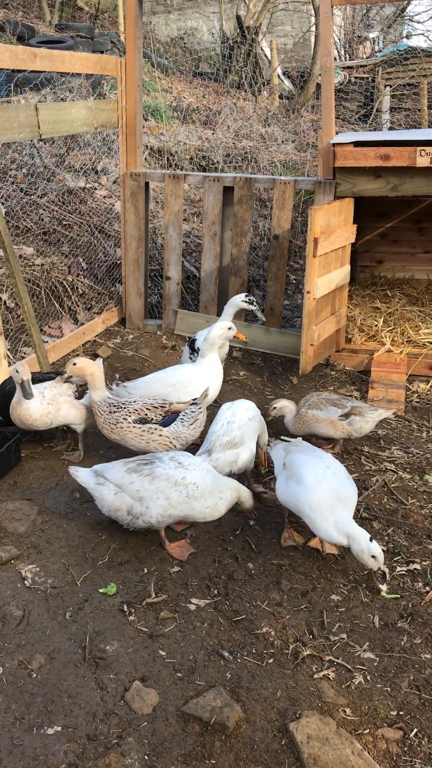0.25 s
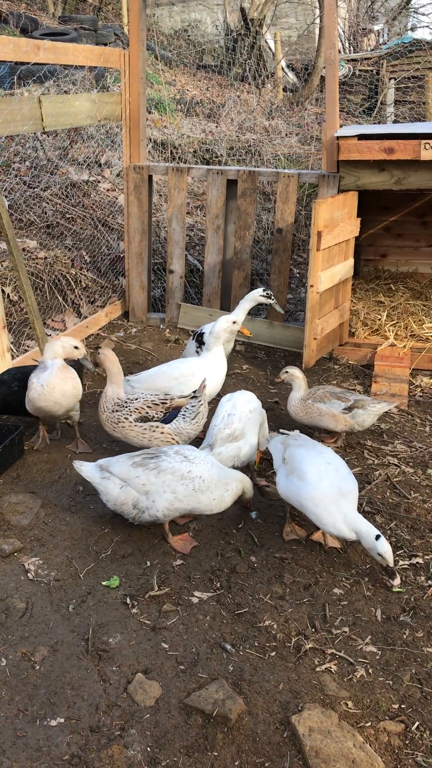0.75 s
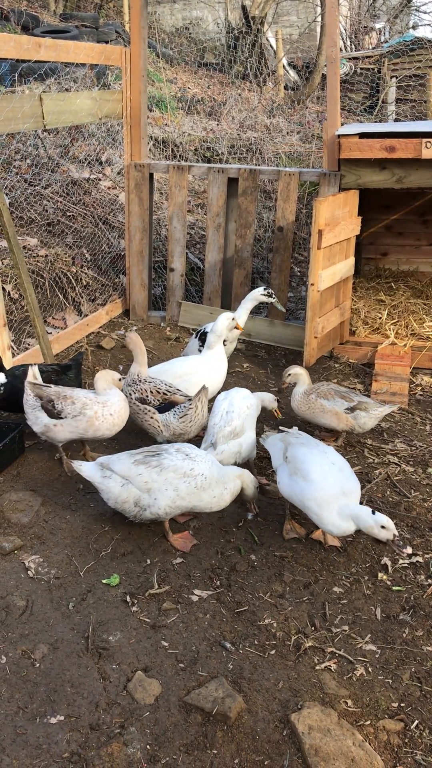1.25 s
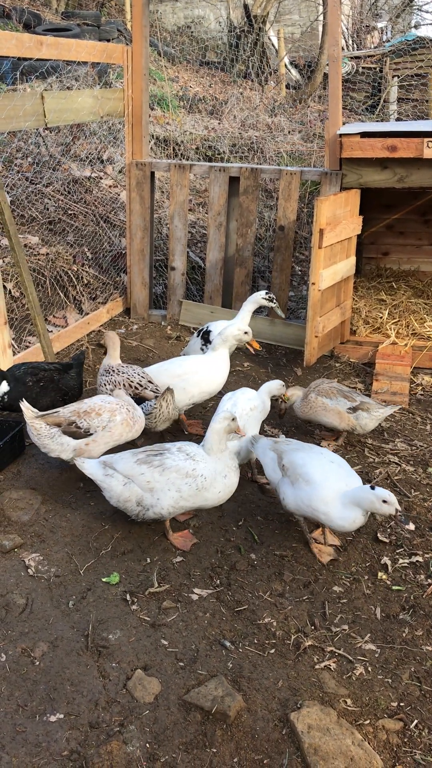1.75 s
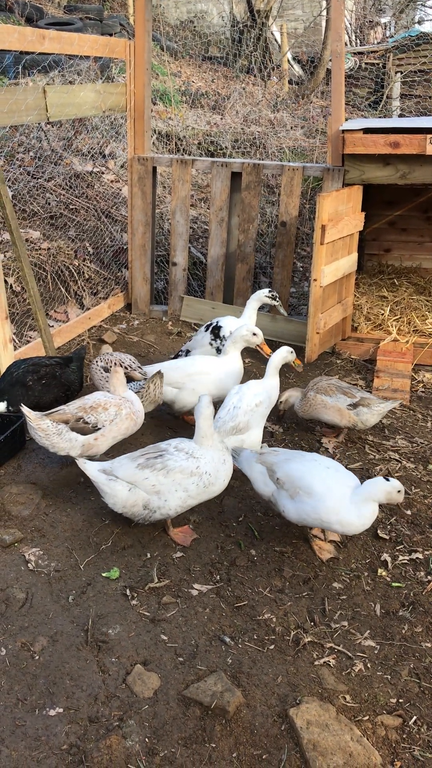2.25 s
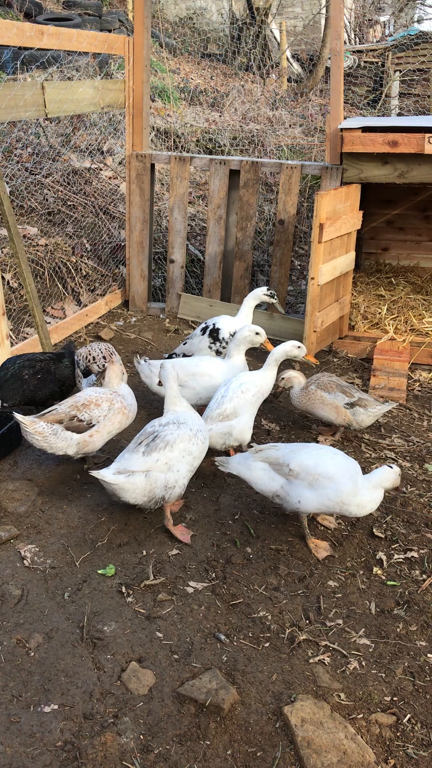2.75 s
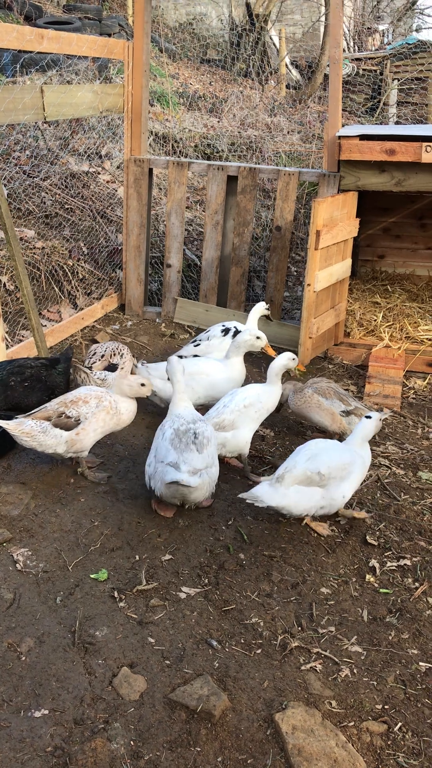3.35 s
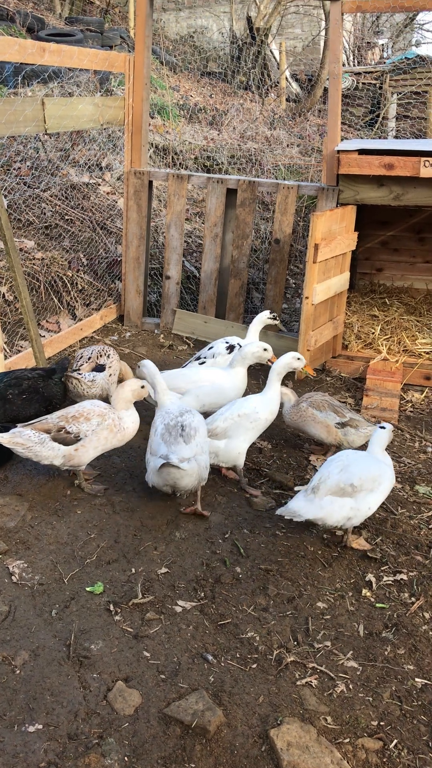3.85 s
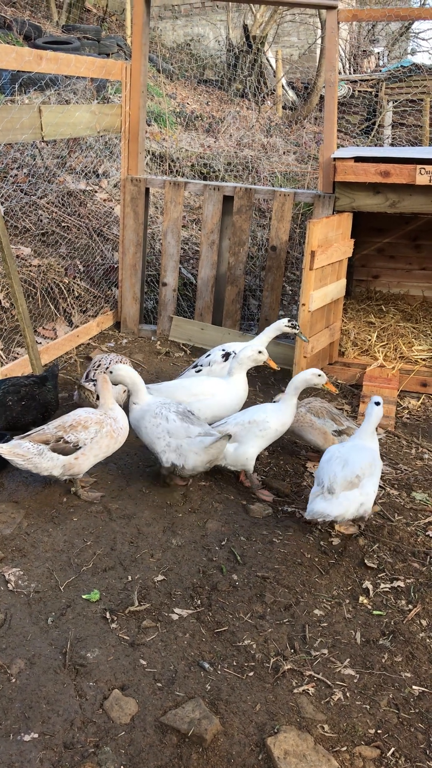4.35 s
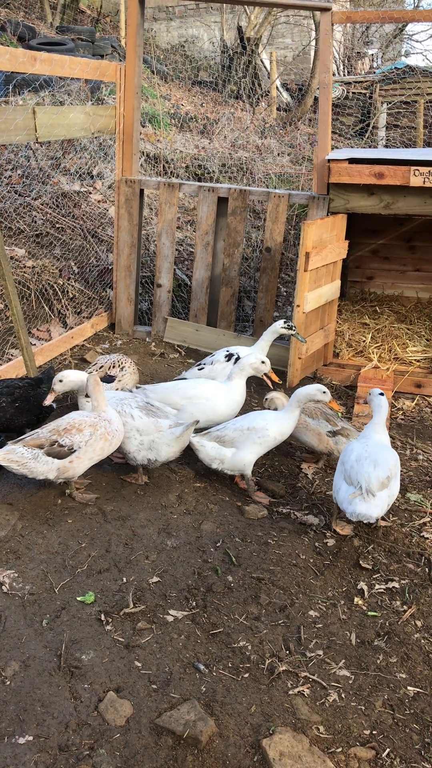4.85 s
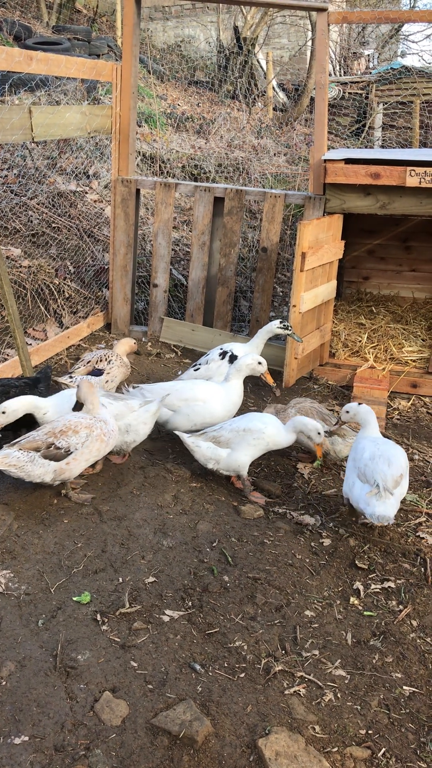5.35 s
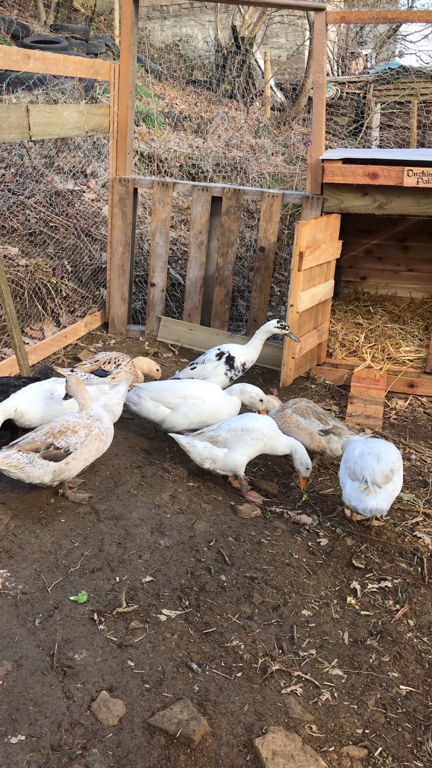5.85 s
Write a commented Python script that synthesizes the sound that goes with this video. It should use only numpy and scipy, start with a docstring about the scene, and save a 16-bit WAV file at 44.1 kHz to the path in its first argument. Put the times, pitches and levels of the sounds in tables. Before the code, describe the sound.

Several ducks quack busily in an outdoor pen, clipped calls tumbling over raspy murmurs and throaty croaks, with faint ticks and shuffling in dirt.

```python
"""Ducks chatter close by over the soft hiss of open air, a far rumble and a faint hum throughout.
Hens quack with quick air snaps ringing in bill and throat; drakes rasp with fluttering bands of noise.
Low croaks are slow snaps in a narrow throat, gulps are snaps in a wide one, and peeps are gliding tones.
Bills and feet click and shuffle as short noise bursts, and the fences give a few short, dull echoes."""
import sys
import numpy as np
from scipy import signal
from scipy.fft import rfft, irfft
from scipy.io import wavfile

SR = 44100
rng = np.random.default_rng(int(sys.argv[2]) if len(sys.argv) > 2 else 0)


def transcribe(signal):
    """Save signal, clipped to [-1, 1], as a 16-bit WAV file at the path in sys.argv[1]."""
    frames = np.atleast_2d(signal).T
    limited = np.clip(frames, -1, 1)
    pcm = np.round(limited * 32767).astype(np.int16)
    wavfile.write(sys.argv[1], SR, pcm)


N = 268877

# Colour of the open-air hiss: (frequency [Hz], relative level per Hz [dB])
AIR_COLOUR = [(30, -34), (60, -21), (110, -10.5), (250, -6.5), (600, -12.5), (1200, -12), (2200, -16),
              (3100, -22), (6000, -28.5), (9000, -36), (16000, -36.5)]
# Slow swells of the hiss: (time [s], change [dB])
AIR_SWELL = [(0, -1.5), (1.3, -5.5), (2.2, 0.5), (3.4, -2.5), (4.5, 1), (6.1, 1)]
# Far rumble: (time [s], level [dB])
RUMBLE_LEVEL = [(0, -59.5), (2, -63), (3.5, -66), (6.1, -67.5)]
# Hum, before its fixed lift and slow waver: (time [s], level [dB])
HUM_LEVEL = [(0.0, -76), (0.32, -66), (1.9, -57.5), (2.93, -64.5), (2.95, -70.5), (6.06, -59), (6.09, -65)]
# Loud ticks of bills and feet, before fixed trims and filtering:
# (time [s], bright part [dB], duller body compared with the bright part [dB])
CLICKS = [(0.0352, -43.5, -13), (0.0555, -41, -18), (0.1163, -30, -15), (0.948, -45.5, -9),
          (1.0082, -44, -27), (2.097, -42, -17), (2.6936, -40, -16), (2.7569, -43, -4),
          (2.7657, -24.5, -32), (3.1057, -40.5, -9), (3.1673, -43, -11), (3.229, -47.5, -5.5),
          (3.462, -46, -5.5), (3.5607, -36, -23), (3.598, -47, 1.5), (4.8274, -46, -29), (4.999, -53, -9),
          (5.019, -34, -30), (5.2014, -53, -9), (5.217, -38.5, -16), (5.2274, -64, -4),
          (5.2604, -34.5, -11.5), (5.296, -52, -5), (5.4122, -38.5, -11.5), (5.593, -33, -8.5),
          (5.9198, -43, -14), (5.953, -27.5, -54), (5.9804, -61.5, 10.5)]
# Quacks: (start of hold [s], attack before it [s], hold [s], bill level at start and end of hold [dB, dB],
# pitch at start and end of hold [Hz, Hz], middle of the bill resonances [Hz],
# throat, first partial, second partial and treble compared with the bill [dB, dB, dB, dB])
QUACKS = [ (.082, .02, 0.013, -37.5, -34.5, 301.5, 252.6, 1800, -1, -7, -7.5, -14),
          (.148, .008, 0.0076, -49, -48.5, 236.6, 208, 1660, -1.5, -11, -6, -15),
          (.19, .014, 0.032, -52.5, -51.5, 273, 229, 1620, 9, 0.5, -4, -10.5),
          (.252, .014, 0.0088, -39, -41, 369.6, 355, 1740, -5, -1, 1.5, -5.5),
          (.284, 0.021, .018, -34.5, -35, 329.5, 250.4, 2000, -4.5, -10, -8, -9),
          (.479, .004, 0.014, -50, -50, 228.2, 219, 1730, -3, 0.5, -2.5, -13),
          (.512, .015, .012, -43.5, -36, 340, 246.7, 1820, -11, -9.5, -12.5, -15.5),
          (.576, .014, .005, -44.5, -52, 190.8, 196, 2030, 2, -12, -25, -7),
          (0.636, 0.011, 0.0082, -26.5, -30, 320.7, 313, 1760, -24, -13.5, -16, -11),
          (.658, 0.015, .014, -34, -37, 254.3, 214.3, 1810, -10.5, -10.5, -16, -14),
          (.746, 0.0073, 0.0073, -30.5, -27, 344.5, 318.3, 1810, -14.5, -14.5, -17, -12.5),
          (.774, .012, 0.017, -35, -33, 353.2, 219.5, 1760, -9, -11, -13.5, -13.5),
          (.886, .006, 0.0063, -60, -60, 281, 250, 1700, 4, 6, 5, -14),
          (.906, 0.0096, .01, -33, -30.5, 274.5, 249.5, 1770, -6.5, -14, -14.5, -14.5),
          (0.949, 0.015, 0.013, -54, -61, 250, 214, 1750, 5, -6, 1, -14),
          (1.104, .006, 0.0056, -62, -63, 280, 249, 1700, 4, 6, 6, -14),
          (1.142, .016, 0.015, -53, -57.5, 203.4, 308, 1690, 10, -2, 5, -19),
          (1.168, .012, 0.009, -38.5, -33, 297, 259.5, 1720, -13, -10.5, -17, -16.5),
          (1.302, .013, 0.0094, -27.5, -30, 268.1, 264, 1750, -13.5, -13, -25, -17),
          (1.518, 0.0082, .006, -55, -56, 250, 230, 1800, 4, -1, 0, -12),
          (1.546, 0.019, 0.015, -42.5, -35.5, 342.2, 233.2, 1940, -5, -6.5, -6.5, -10.5),
          (1.66, 0.0048, 0.026, -38, -33.5, 272.6, 316, 2040, -6, -7.5, -10, -10),
          (1.727, 0.0082, .007, -56, -58, 260, 241, 1800, 8, 2, 4, -14),
          (1.759, 0.011, .03, -48, -62, 339, 282, 2140, 0.5, 0, -2.5, -14),
          (1.815, .008, .008, -55.5, -59, 267, 240, 1800, 8.5, 1, 6, -14),
          (1.874, .01, 0.027, -51.5, -46.5, 267.4, 227, 1840, 3, 0.5, -1.5, -14),
          (1.909, 0.011, 0.015, -43, -36, 341.6, 274.6, 2010, 0.5, -5, -3, -12.5),
          (2.02, 0.0057, 0.026, -37, -32, 230.3, 256.5, 1930, -1, -9.5, -14.5, -10),
          (2.175, .02, 0.024, -42.5, -33, 280.3, 270, 1910, -2, -10.5, -11.5, -14.5),
          (2.238, .012, 0.016, -39, -35.5, 350, 268, 1940, -1, -7, -3.5, -7),
          (2.316, .018, 0.029, -38, -35.5, 357.7, 299, 1950, 0.5, -5.5, -2, -9),
          (2.402, .006, 0.0069, -50.5, -56, 258, 240, 1700, 8, -2, -2, -14),
          (2.438, 0.011, 0.025, -34.5, -33.5, 350.7, 300.7, 2010, -2, -8, -7, -7),
          (2.5, .016, .016, -42, -46.5, 256, 267, 1760, 4, -3.5, -5.5, -10.5),
          (2.562, 0.021, 0.045, -35, -33, 347.2, 311.5, 2050, -6.5, -9.5, -11, -13),
          (2.705, 0.015, 0.033, -30, -35, 337, 280, 2075, -10.5, -11.5, -14.5, -12),
          (2.822, 0.0087, 0.032, -33.5, -29, 348.7, 301, 2060, -13.5, -12.5, -11.5, -10),
          (2.942, .016, 0.037, -28.5, -29.5, 332, 282, 1950, -17, -16, -17.5, -15),
          (3.072, .016, 0.0045, -28.5, -24, 325.5, 335.6, 2010, -14, -13.5, -17.5, -13),
          (3.09, .016, .018, -32.5, -34.5, 343.2, 239.4, 1870, -8, -10.5, -11.5, -10.5),
          (3.232, 0.019, 0.018, -44, -40, 236.6, 251.6, 1870, -5, -3.5, -12, -12.5),
          (3.27, .014, 0.0072, -45, -53, 218, 190, 1820, -4, -17, -15, -21),
          (3.301, 0.019, 0.0099, -44, -47.5, 361, 277, 1660, 3.5, -6.5, -6, -9.5),
          (3.381, 0.017, 0.015, -48.5, -44.5, 320, 228.3, 1880, 1, 0, -1, -5.5),
          (3.455, 0.011, 0.0057, -49.5, -52, 395, 388, 2130, 10, 6.5, -9, -3),
          (3.474, .016, 0.0067, -41.5, -35.5, 276.4, 264.3, 2050, -3.5, -10.5, -9, -5),
          (3.585, .005, 0.04, -37.5, -39, 299.3, 267, 1960, -2, -8.5, -10, -8),
          (3.696, .016, 0.045, -41.5, -38.5, 344.6, 299, 2090, -6, -5.5, -4.5, -3),
          (3.822, 0.022, 0.035, -32, -29, 354.8, 337.6, 2140, -9, -14, -12, -10),
          (3.956, .018, .046, -29.5, -32, 347.7, 259.7, 2030, -15, -16, -17, -14),
          (4.076, 0.02, 0.031, -28.5, -28, 351.7, 310.4, 1920, -18, -17, -18.5, -13.5),
          (4.497, .014, 0.023, -42.5, -34, 352, 345, 2160, -6.5, -9.5, -20, -4),
          (4.594, .012, 0.057, -40.5, -42, 360, 305, 1940, -2, -19, -17, -7.5),
          (4.667, .01, 0.038, -38.5, -35.5, 321.6, 276, 2240, -4.5, -10, -15, -7.5),
          (4.782, .018, 0.028, -37, -36.5, 339.3, 290.4, 2110, -2.5, -8, -10.5, -8.5),
          (4.9, .02, 0.025, -34, -33, 354, 330, 2010, -10.5, -12, -11.5, -8),
          (5.027, 0.013, .062, -36.5, -42.5, 331.2, 265, 1970, -6, -11, -11.5, -8),
          (5.228, .008, .012, -52.5, -56, 259.6, 229, 2120, 2, -3, -2, -16),
          (5.262, 0.0067, 0.0068, -44.5, -45.5, 307.4, 292.5, 1880, 1.5, -4, -6, -14),
          (5.296, 0.0078, .006, -45, -57, 290, 282, 1960, -6, -6, -7, -10),
          (5.348, .016, .014, -40.5, -33.5, 348.5, 288.3, 1780, -4, -9.5, -9, -10),
          (5.465, .022, 0.026, -36, -35, 344.4, 251, 1880, -7, -9, -8, -7),
          (5.562, .014, 0.022, -34, -37.5, 330.3, 291.4, 2050, 0, -6, -7.5, -8.5),
          (5.668, .016, 0.033, -39, -30, 352, 329.5, 2090, -5.5, -10, -7.5, -5),
          (5.793, 0.0079, 0.052, -36, -36, 355, 248.3, 2030, -6, -10.5, -10, -9),
          (6.088, 0.019, 0.013, -41.5, -37.5, 353, 343, 2170, 0, -6.5, -10, -8)]
# Resonances: (centre [Hz], width on the first filter pass [Hz], relative level [dB])
# The bill centres are for a bill whose middle is BILL_MIDDLE_HZ; each quack shifts them to its own.
BILL = [(1720, 230, 0), (2030, 260, 0), (2400, 280, -2), (3050, 300, -16)]
THROAT = [(854, 303, -2.1), (1204, 238, 0.15)]
TREBLE = [(4080, 680, 3.5), (5690, 570, -3), (6220, 1770, -11), (8870, 1170, -20), (11700, 3900, -26.5)]
# Peeps and squeaks, before a slight waver:
# (time [s], length [s], start pitch [Hz], end pitch [Hz], peak level [dB])
PEEPS = [(.31, .028, 1020, 960, -43), (0.411, 0.019, 1330, 1350, -50.5), (1.091, 0.044, 1370, 1380, -49),
         (3.538, 0.01, 3110, 3130, -47), (4.393, 0.021, 1520, 1840, -45), (4.399, 0.039, 945, 1006, -48),
         (4.958, 0.064, 1147, 1285, -56), (4.985, 0.041, 2730, 3000, -58), (5.158, 0.014, 810, 590, -37),
         (5.161, .014, 3200, 3260, -44), (5.256, 0.008, 3060, 3230, -38.5), (5.263, 0.031, 2287, 2530, -56),
         (5.299, 0.035, 1200, 1360, -48), (5.723, 0.039, 1030, 560, -39)]
# Drake rasps: (time [s], length [s], start level [dB], end level [dB],
# start factor on the band frequencies [1 = usual], end factor [1 = usual], treble change [dB])
RASPS = [(0.318, 0.11, -53, -50, 0.97, 0.95, -1), (.535, 0.089, -44, -49, 0.99, 0.95, -1),
         (0.832, .065, -42.5, -49, 1.02, .99, .5), (1.037, 0.097, -42.5, -51, 1.01, 0.95, 2.5),
         (1.356, 0.23, -48, -54.5, 0.91, 1.02, -2), (1.738, 0.079, -50.5, -48.5, 0.98, 1.01, 1),
         (2.13, 0.19, -41, -50, 0.98, 1.0, -6), (2.512, 0.055, -56, -37, 1.02, 0.96, -4),
         (2.619, 0.077, -46, -53.5, 1.03, 0.94, -1), (4.2, 0.078, -45.5, -49.5, .99, .97, 2.5),
         (4.436, 0.056, -48.5, -43, 0.95, 1.01, 3.5), (5.081, 0.092, -39.5, -44.5, 1.04, 0.98, -.5),
         (5.491, 0.2, -44, -45.5, 1.04, 1.02, 2.5), (5.851, 0.05, -46, -44.5, 1.07, 1.05, 4),
         (6.022, .077, -44, -46.5, 0.96, 1.1, 5.5)]
# Noisy bands of a breathy rasp, the main ones near harmonics of about 460 Hz:
# (usual centre [Hz], width on the first filter pass [Hz], relative level [dB])
RASP_BANDS = [(1050, 200, -12), (1390, 80, -6), (1790, 140, -1), (2280, 80, 1), (2760, 80, -6),
              (4100, 600, -19), (5500, 500, -13)]
# Low croaks: (time [s], length [s], start level [dB], end level [dB],
# start throat resonance [Hz], end throat resonance [Hz])
CROAKS = [(3.61, .024, -32, -38, 1140, 1110), (3.645, 0.02, -36, -35, 1170, 1170),
          (3.678, .132, -33, -38, 1195, 1220), (4.487, 0.065, -32.5, -41.5, 1266, 1230),
          (4.552, .092, -39, -27.5, 1260, 1350), (4.64, 0.14, -34, -33, 1300, 1350),
          (4.846, 0.029, -39.5, -43, 1260, 1330), (5.365, 0.045, -35.5, -35, 1230, 1360),
          (5.422, 0.062, -36, -36.5, 1340, 1090), (5.505, 0.11, -42, -35.5, 1200, 1190)]
# Fixed side resonances of a croak: (centre [Hz], width on the first filter pass [Hz], relative level [dB])
CROAK_SIDE = [(243, 135, -8), (800, 290, -10.5), (2350, 140, -17.5), (3870, 2100, -33)]
# Gulps: (time [s], length [s], snaps per second [1/s], start level [dB], overall level [dB]);
# the snaps swell by the difference of the two levels
GULPS = [(4.175, 0.026, 108, -51, -37.5), (4.289, .026, 112, -54, -35.5)]
# Wide gulping throat: (centre [Hz], width on the first filter pass [Hz], relative level [dB])
GULP_THROAT = [(250, 103, -3), (885, 250, 6), (1376, 170, 8), (1640, 500, -3.5)]
# Echoes from the fences: (delay [s], level [dB])
ECHOES = [(.006, -8), (0.015, -10.5), (0.023, -61), (.034, -47), (0.053, -25.5)]

AIR_DB = -56  # before the slow swells
HUM_HZ, HUM_LIFT_DB = 49.6, 2.5
BILL_MIDDLE_HZ = 2000
OPENING_SHARE, RISE_S = .82, .01  # pitch starts at this share, and arrives this far into the hold
SAG_DELAY_PER_S = 55  # the longer the hold, the later its pitch sags
REST_HZ, DROP_S = 183.5, .012  # after the hold the pitch drops to this, in this time
SWELL_DB_PER_S = 94  # longer holds swell more in the middle
ATTACK_DB, ATTACK_POWER = 33.5, 1.23  # rise as the bill opens, and its curve
RELEASE_S, RELEASE_DB = 0.028, 30  # fall as the bill closes
RASP_PER_S, RASP_SWELL_DB = 150., 2.5
CROAK_PER_S = 122  # snaps per second, before their waver
CROAK_WAVER_DB, CROAK_WAVER = 0.4, .02  # unsteady level, and throat as a share of its frequency
CUTOFF_HZ = 17200


def from_db(db):
    """Turns decibels into a size to multiply by."""
    return 10 ** (np.asarray(db) / 20)


def rms_one(x):
    """Scales a sound to an average (rms) strength of 1."""
    return x / np.sqrt(np.mean(x ** 2) + 1e-20)


def over_time(table):
    """Draws a line through a table of times and values, for the whole scene."""
    return np.interp(np.arange(N) / SR, *np.transpose(table))


def spread(rows):
    """Gives the first sample of a short table and its columns drawn out sample by sample."""
    s, *columns = np.transpose(rows)
    at = np.arange(round(s[0] * SR), min(round(s[-1] * SR), N))
    return at[0], [np.interp(at / SR, s, c) for c in columns]


def add(out, x, start):
    """Mixes x into out from the start sample."""
    out[start:start + len(x)] += x[:N - start]


def drift(rate, size):
    """Wanders by chance around 0, with rate new random points a second joined by lines."""
    knots = rng.standard_normal(int(size * rate / SR) + 2)
    return np.interp(np.arange(size) * rate / SR, np.arange(len(knots)), knots)


def resonate(x, modes):
    """Rings x in several resonances side by side, with every other one flipped in sign."""
    out = 0
    for k, (hz, width, db) in enumerate(modes):
        r = np.exp(-np.pi * width / SR)
        top = [(1 - r * r) / 2, 0, (r * r - 1) / 2]
        bottom = [1, -2 * r * np.cos(2 * np.pi * hz / SR), r * r]
        out = out + (-1) ** k * from_db(db) * signal.lfilter(top, bottom, x)
    return out


def steep(x, modes):
    """Rings x twice in each resonance, for deep valleys between them, then sets the rms to 1."""
    out = 0
    for k, (hz, width, db) in enumerate(modes):
        once = resonate(x, [(hz, width, 0)])
        twice = resonate(once, [(hz, 2 * width, 0)])
        out = out + (-1) ** k * from_db(db) * twice
    return rms_one(out)


def gliding(x, hz, width):
    """Rings x in a resonance whose centre moves, block by block; rms 1."""
    out, state, r = np.zeros(len(x)), np.zeros(2), np.exp(-np.pi * width / SR)
    for i in range(0, len(x), 256):
        bottom = [1, -2 * r * np.cos(2 * np.pi * hz[i] / SR), r * r]
        out[i:i + 256], state = signal.lfilter([1, 0, -1], bottom, x[i:i + 256], zi=state)
    return rms_one(out)


def syrinx(pitch, jitter, shimmer_db, rough):
    """The voice organ snaps once a cycle, unevenly, with fading puffs of noise; also counts the cycles."""
    turns = np.cumsum(pitch * (1 + jitter * drift(300, len(pitch)))) / SR
    snap_sizes = from_db(shimmer_db * rng.standard_normal(len(pitch)))
    snaps = np.diff(np.floor(turns), prepend=-1) * snap_sizes
    puffs = rng.standard_normal(len(pitch)) * np.exp(-2.0 * (turns % 1))
    rough = np.clip(rough, 0, 1)  # share of the power that is noise
    return np.sqrt(1 - rough) * rms_one(snaps) + np.sqrt(rough) * rms_one(puffs), turns


def open_air():
    """Coloured noise hisses and swells a little, over a low-noise rumble and a wavering sine hum."""
    hz, db = np.transpose(AIR_COLOUR)
    noise_hz = np.fft.rfftfreq(N, 1 / SR)
    colour = from_db(np.interp(np.log(noise_hz + 1), np.log(hz), db))
    noise = rms_one(irfft(rfft(rng.standard_normal(N)) * colour, N))
    hiss = from_db(AIR_DB + over_time(AIR_SWELL) + 0.24 * drift(3.4, N)) * noise
    rumble = from_db(over_time(RUMBLE_LEVEL)) * steep(rng.standard_normal(N), [(67, 21.4, 0)])
    hum_turns = np.cumsum(HUM_HZ * (1 + 0.014 * drift(3.8, N))) / SR
    hum_db = over_time(HUM_LEVEL) + HUM_LIFT_DB + 3.0 * drift(7.0, N)
    return hiss + rumble + from_db(hum_db) * np.sin(2 * np.pi * hum_turns)


def shuffling():
    """Webbed feet and bills stir the dirt: soft, short, dull puffs of noise at random times."""
    out, t = np.zeros(N), np.arange(1500) / SR
    for when, pitch, loud in rng.random((150, 3)):
        hz = 400 * 5.0 ** pitch  # from 400 to 2000 Hz
        puff = rng.standard_normal(1500) * t * np.exp(-t / .003)
        add(out, from_db(-68 + 10 * loud) * steep(puff, [(hz, 1.2 * hz, 0)]), int(when * (N - 1)))
    return out


def clicks():
    """Bills and feet tick on grit: sharp noise bursts with a duller body, among many faint ones."""
    bright, body, t = np.zeros(N), np.zeros(N), np.arange(600) / SR
    for s, db, body_db in CLICKS:
        fade = np.exp(-t / 0.0011) + 0.37 * np.exp(-t / 0.0056)  # fast, with a weaker tail
        burst = rng.standard_normal(600) * fade
        add(bright, from_db(db - 7.0) * burst, round(s * SR))
        add(body, from_db(db + body_db - 1.0) * burst, round(s * SR))
    # faint ticks: about 150 a second, now denser and now sparser, of mixed strength
    happens = rng.random(N) < 150 * from_db(6.0 * drift(8, N)) / SR
    strength = from_db(0.61 * np.minimum(rng.exponential(1, N), 4))
    faint = happens * rng.standard_normal(N) * strength
    bright += from_db(-50.0) * faint
    body += from_db(-58) * faint
    return resonate(bright, [(12900, 29000, 2.5)]) + resonate(body, [(3120, 1400, 11.0), (6100, 1860, 18.06)])


def quack_shape(s, attack, hold, from_level_db, to_level_db, from_hz, to_hz):
    """The bill opens, holds with a swell while the pitch glides, then closes: first sample, pitch, level."""
    start = round((s - attack) * SR)
    t = np.arange(start, min(round((s + hold + RELEASE_S) * SR), N)) / SR - s  # 0 at the start of the hold
    held = np.clip(t / hold, 0, 1)
    opening, closing = np.clip(-t / attack, 0, 1), np.clip(t - hold, 0, None)
    level_db = from_level_db + (to_level_db - from_level_db) * held
    level_db += SWELL_DB_PER_S * hold * np.sin(np.pi * held)
    level_db -= ATTACK_DB * opening ** ATTACK_POWER + RELEASE_DB * closing / RELEASE_S
    still_to_rise = np.clip(1 - (t + attack) / (attack + RISE_S), 0, 1)
    pitch = from_hz * (1 - (1 - OPENING_SHARE) * still_to_rise ** 2)
    pitch += (to_hz - from_hz) * held ** (1 + SAG_DELAY_PER_S * hold)
    pitch += (REST_HZ - to_hz) * np.clip(closing / DROP_S, 0, 1)
    return start, pitch, level_db


def quacks():
    """Snaps ring in bill and throat; the chest wall adds two clean low partials and a soft push of air."""
    out = np.zeros(N)
    for *shape, middle_hz, throat_db, first_db, second_db, treble_db in QUACKS:
        start, pitch, bill_db = quack_shape(*shape)
        size = len(pitch)
        slack = 1 - pitch / pitch.max()  # as the pitch sags the voice turns hoarse
        source, turns = syrinx(pitch, jitter=.015, shimmer_db=2, rough=.15 + .8 * slack)
        # turbulence, pulsed each cycle, shows most in the treble
        airy = source + 2 * rng.standard_normal(size) * np.exp(-2 * (turns % 1))
        tuning = middle_hz / BILL_MIDDLE_HZ
        bill = [(hz * tuning, w, db + 3.15 * rng.standard_normal()) for hz, w, db in BILL]
        upper = steep(source, bill) + from_db(treble_db) * steep(airy, TREBLE)
        # throat and chest go on sounding while the bill closes: they fall less than the bill does
        top_db, edges = bill_db.max(), signal.windows.tukey(size, .25)
        below_top_db = bill_db - top_db
        throat = from_db(top_db + throat_db + 0.42 * below_top_db) * steep(source + .5 * airy, THROAT)
        first = from_db(first_db + 2 * drift(147, size)) * np.sin(2 * np.pi * turns)
        second_level = from_db(second_db - 16.5 * slack + 1.7 * drift(145, size))
        second = second_level * np.sin(4 * np.pi * turns + 1)
        push = from_db(first_db - 8.0) * steep(airy, [(184.0, 69, 0)])
        chest = from_db(top_db + 0.66 * below_top_db) * (np.sqrt(2) * (first + second) + push)
        add(out, from_db(bill_db) * upper + edges * (throat + chest), start)
    return out


def peeps():
    """Thin peeps and squeaks are nearly pure gliding tones, slightly unsteady."""
    out = np.zeros(N)
    for s, length, from_hz, to_hz, db in PEEPS:
        size = round(length * SR)
        hz = np.linspace(from_hz, to_hz, size) * (1 + .03 * drift(300, size))
        tone = np.sin(2 * np.pi * np.cumsum(hz) / SR)
        level = from_db(db + 2 * drift(99, size)) * signal.windows.tukey(size, .6)
        add(out, level * tone, round(s * SR))
    return out


def rasps():
    """Drakes rasp in a breathy voice: noisy bands near the harmonics of about 460 Hz rise, glide and sink."""
    out = np.zeros(N)
    for s, length, first_db, last_db, first_factor, last_factor, treble_db in RASPS:
        start, (level_db,) = spread([(s, first_db), (s + length, last_db)])
        size = len(level_db)
        air, _ = syrinx(np.full(size, RASP_PER_S), jitter=.3, shimmer_db=3, rough=.6)
        glide = np.linspace(first_factor, last_factor, size)
        arch = glide * (1 - 0.047 * (1 - signal.windows.tukey(size, .45)))  # lower at both ends
        voice = 0
        for hz, width, db in RASP_BANDS:
            band = gliding(gliding(air, hz * arch, width), hz * arch, 3 * width)
            voice = voice + from_db(db + treble_db * (hz > 3500)) * band
        level = from_db(level_db + RASP_SWELL_DB * np.hanning(size)) * signal.windows.tukey(size, .3)
        add(out, level * rms_one(voice), start)
    return out


def croaks():
    """Slow separate snaps each ring in a narrow throat that moves."""
    out = np.zeros(N)
    for s, length, first_db, last_db, first_hz, last_hz in CROAKS:
        start, (level_db, throat_hz) = spread([(s, first_db, first_hz), (s + length, last_db, last_hz)])
        size = len(level_db)
        level_db = level_db + CROAK_WAVER_DB * drift(32.6, size)
        throat_hz = throat_hz * (1 + CROAK_WAVER * drift(37, size))
        per_s = CROAK_PER_S * (1 + .05 * drift(25, size))
        source, _ = syrinx(per_s, jitter=.13, shimmer_db=3, rough=.17)
        throat = gliding(gliding(source, throat_hz, 135), throat_hz, 400)
        side = from_db(-7.5) * steep(source, CROAK_SIDE)
        add(out, from_db(level_db) * signal.windows.tukey(size, .2) * (throat + side), start)
    return out


def gulps():
    """A few slow, swelling snaps ring out in a wide, open throat."""
    out = np.zeros(N)
    for s, length, per_s, first_db, last_db in GULPS:
        size = round(length * SR)
        source, _ = syrinx(np.full(size, per_s), jitter=.05, shimmer_db=1.5, rough=.1)
        swell = from_db(np.linspace(first_db - last_db, 0, size))
        swelling = np.pad(source * swell, (0, 800))  # leaves room to ring out
        add(out, from_db(last_db) * steep(swelling, GULP_THROAT), round(s * SR))
    return out


def fences(x):
    """The fences send back a few delayed, duller copies of the sound."""
    out, dull = np.zeros(N), resonate(x, [(1890, 3940, 0)])
    for s, db in ECHOES:
        add(out, from_db(db) * dull, round(s * SR))
    return out


def scene():
    """The flock and its echoes sound over the open air, in one channel."""
    flock = quacks() + croaks() + gulps() + peeps() + rasps() + clicks() + shuffling()
    return (flock + fences(flock) + open_air())[None]


def record(dry):
    """A steep low-pass filter cuts the highest treble."""
    return signal.sosfilt(signal.cheby2(12, 70, CUTOFF_HZ, fs=SR, output="sos"), dry)


dry = scene()
out = record(dry)
transcribe(out)
```